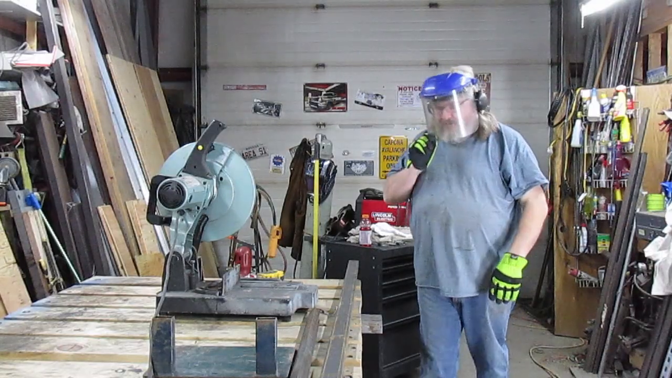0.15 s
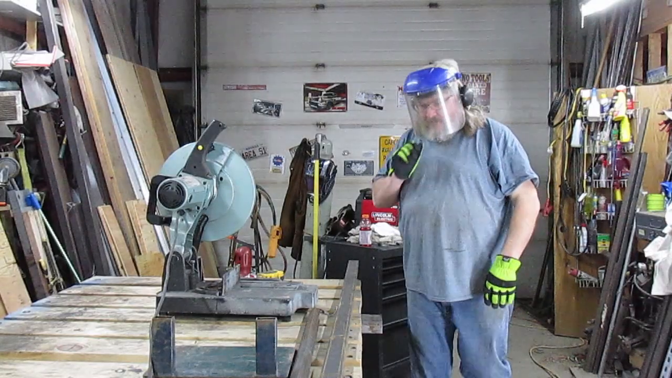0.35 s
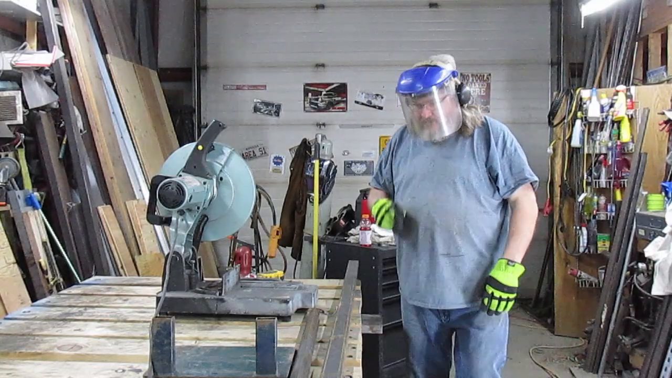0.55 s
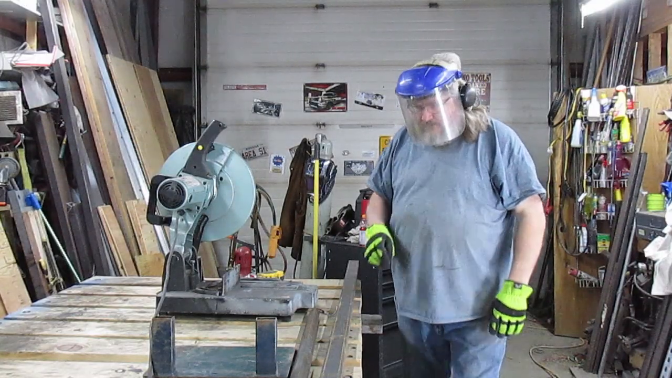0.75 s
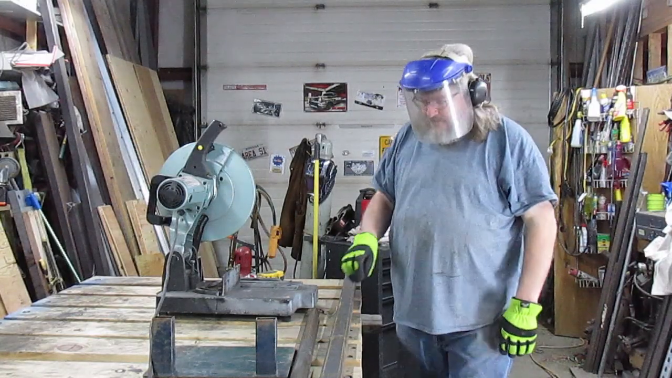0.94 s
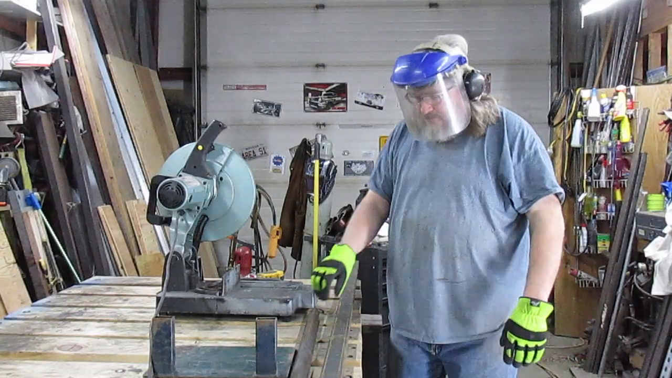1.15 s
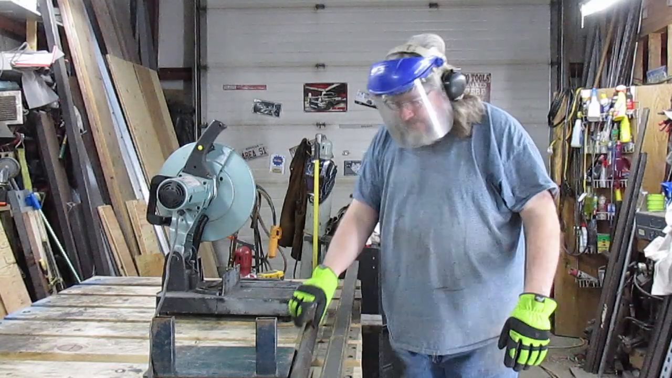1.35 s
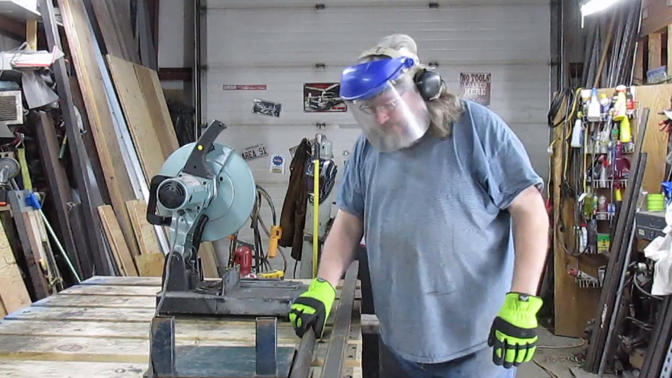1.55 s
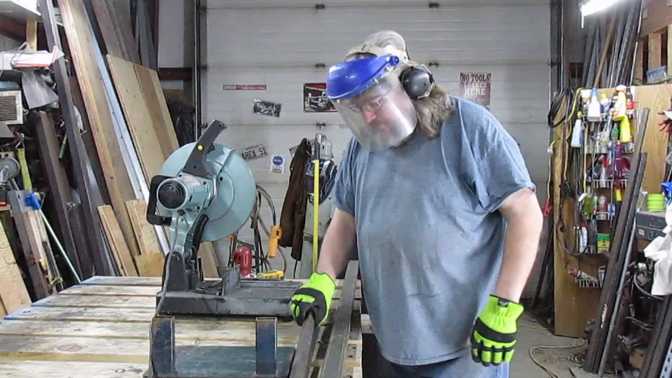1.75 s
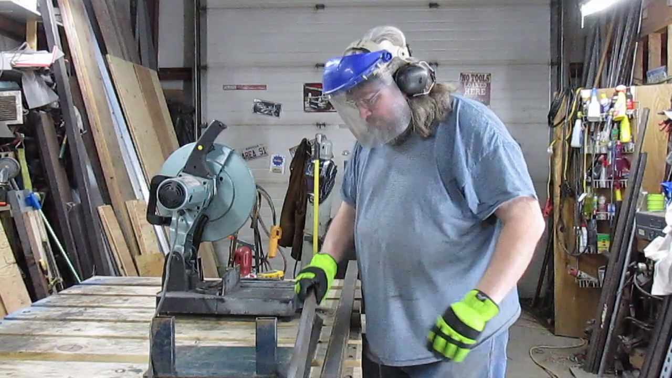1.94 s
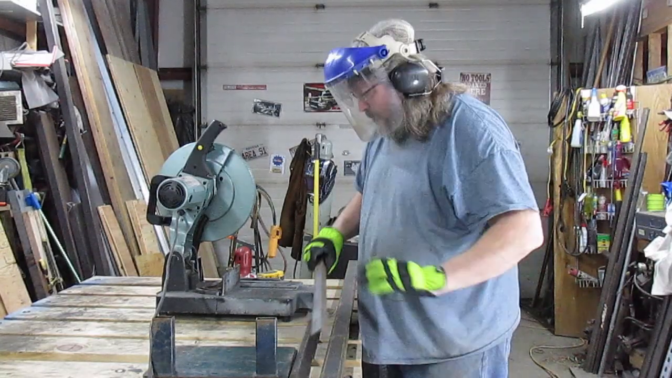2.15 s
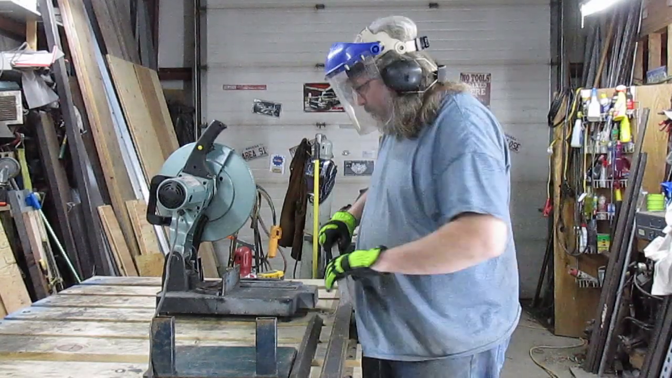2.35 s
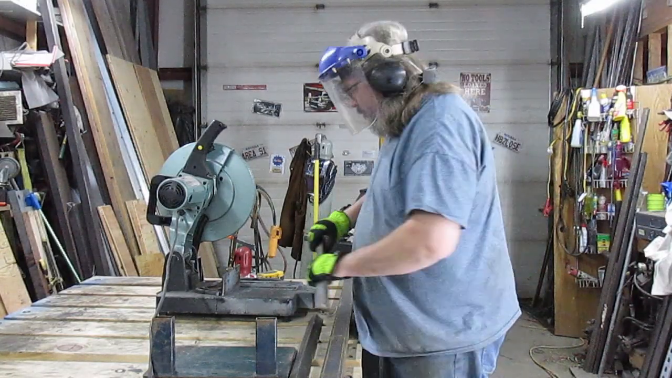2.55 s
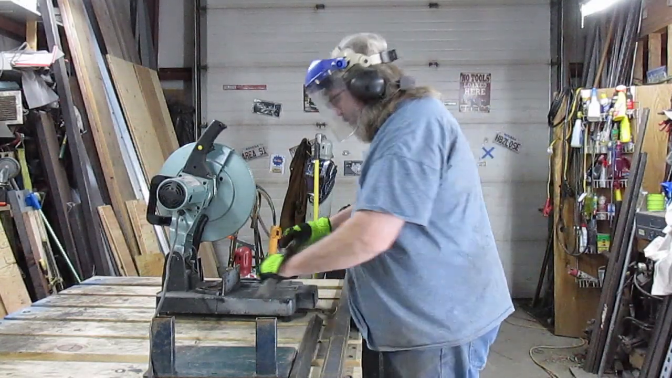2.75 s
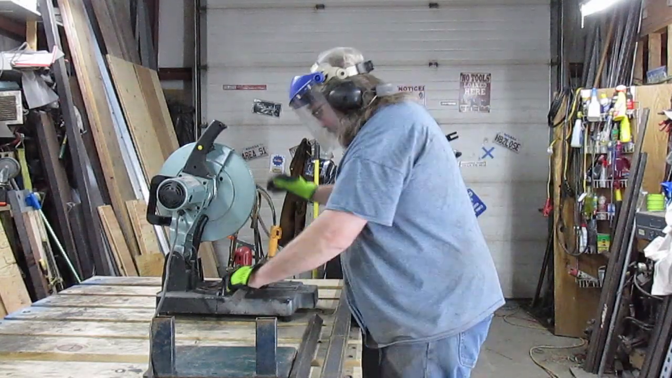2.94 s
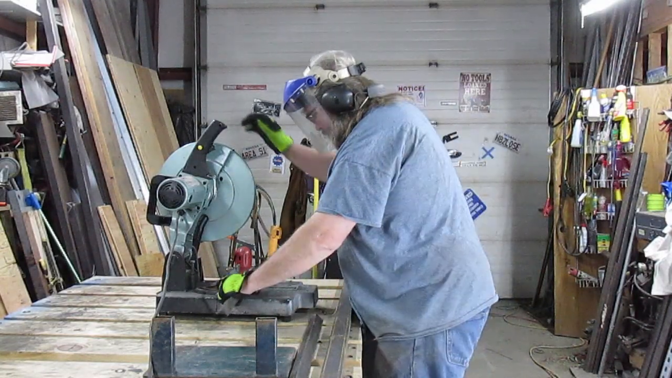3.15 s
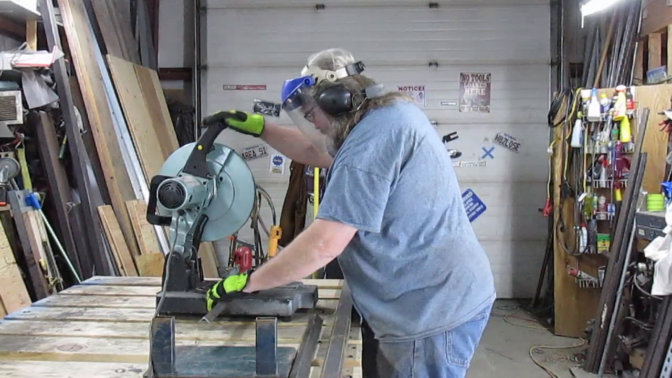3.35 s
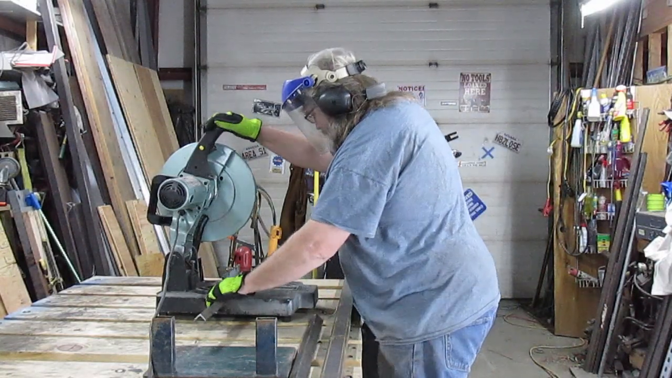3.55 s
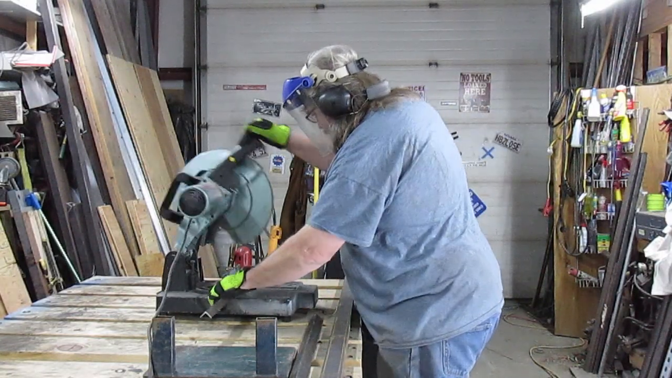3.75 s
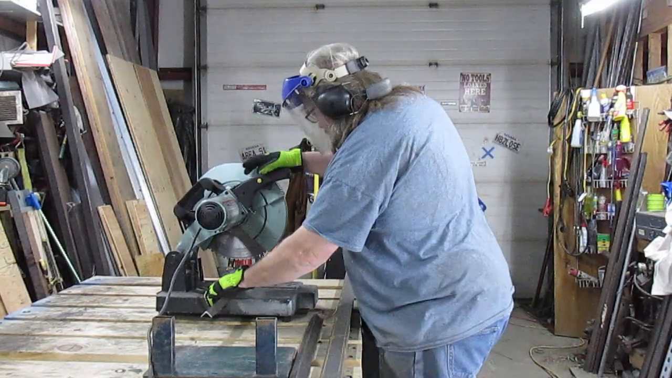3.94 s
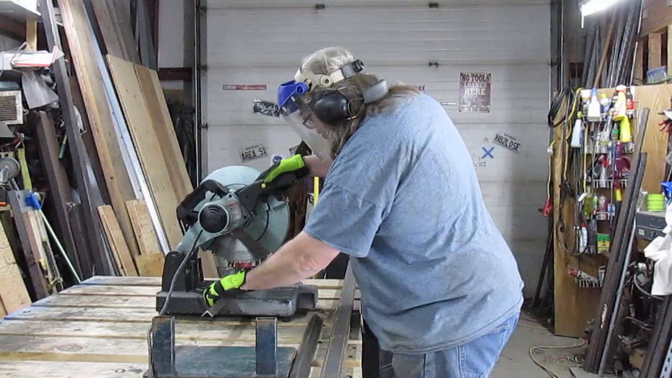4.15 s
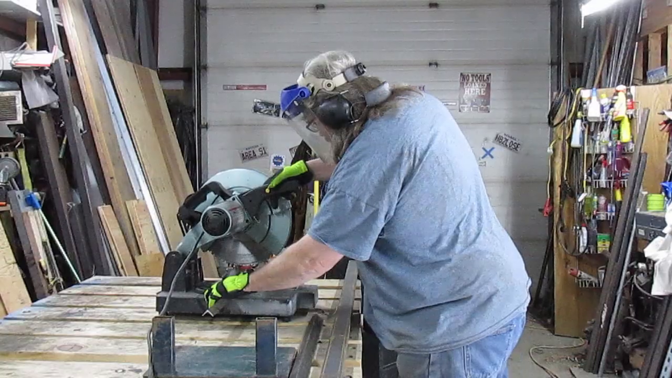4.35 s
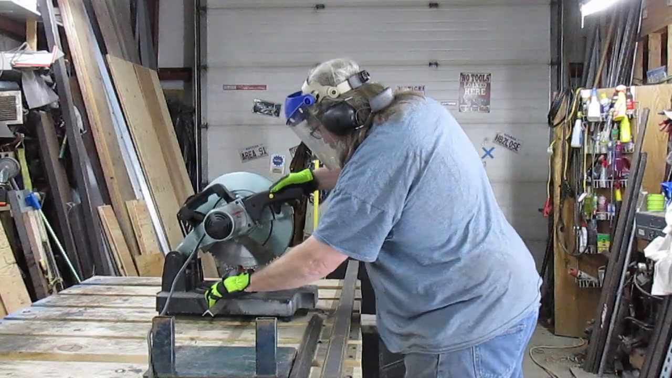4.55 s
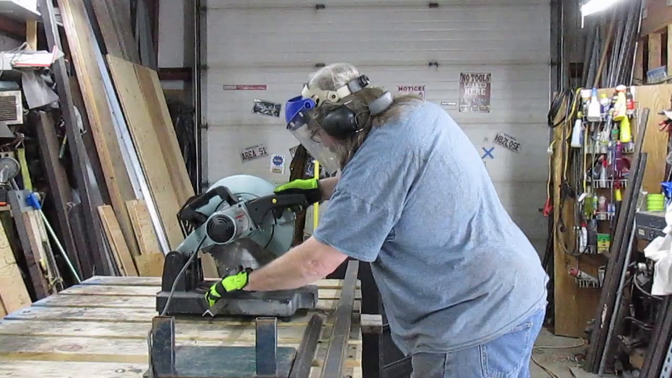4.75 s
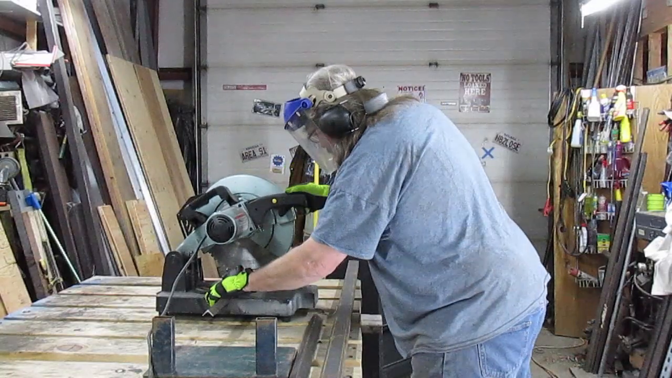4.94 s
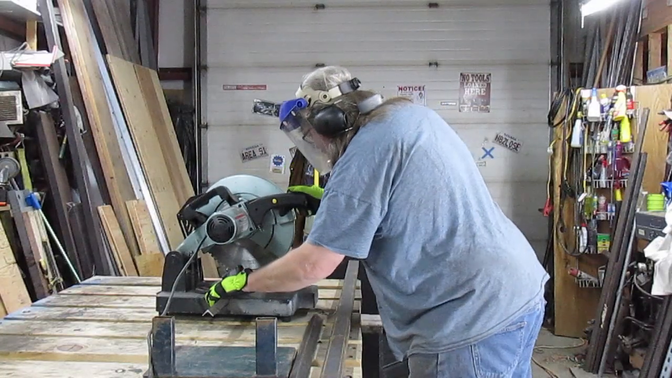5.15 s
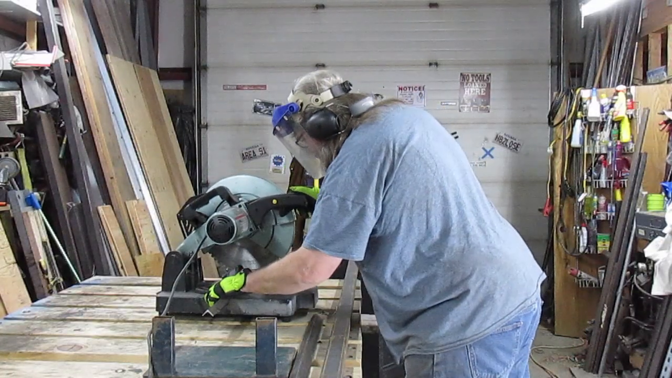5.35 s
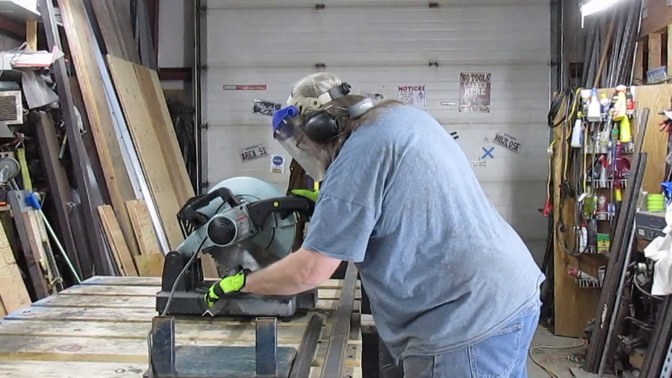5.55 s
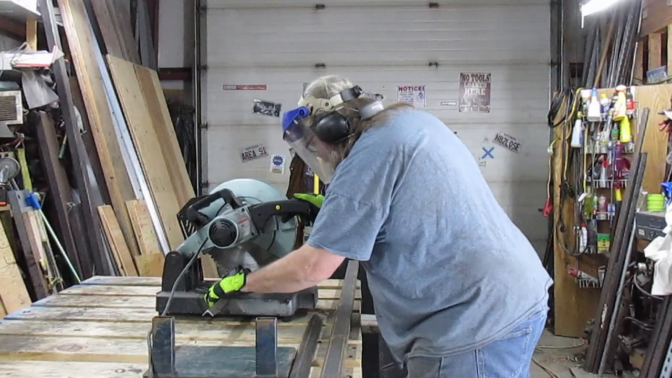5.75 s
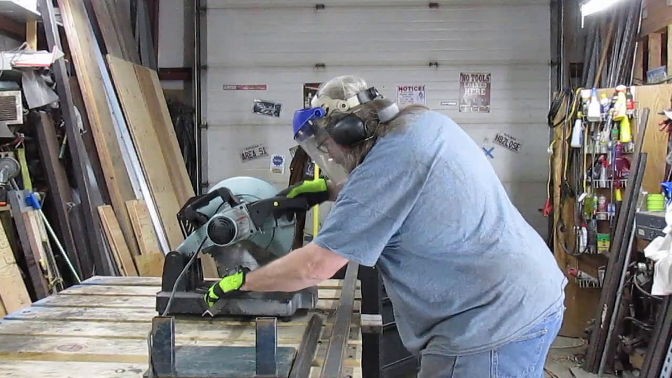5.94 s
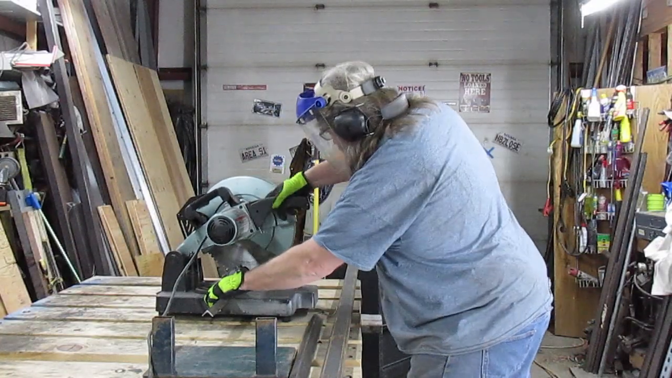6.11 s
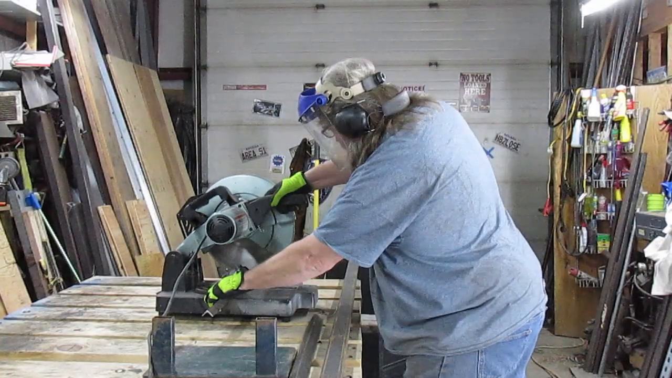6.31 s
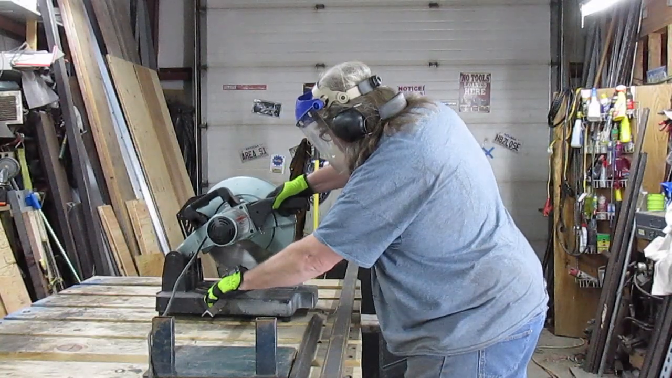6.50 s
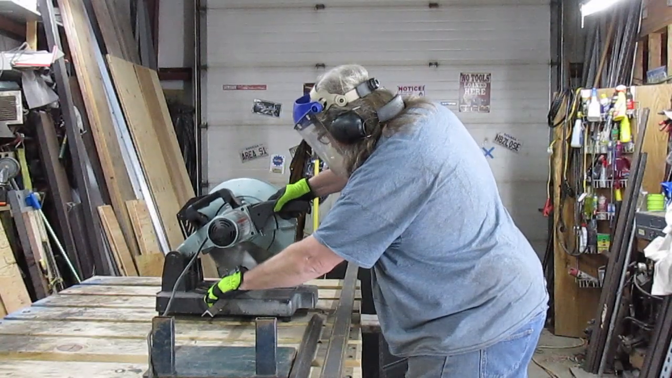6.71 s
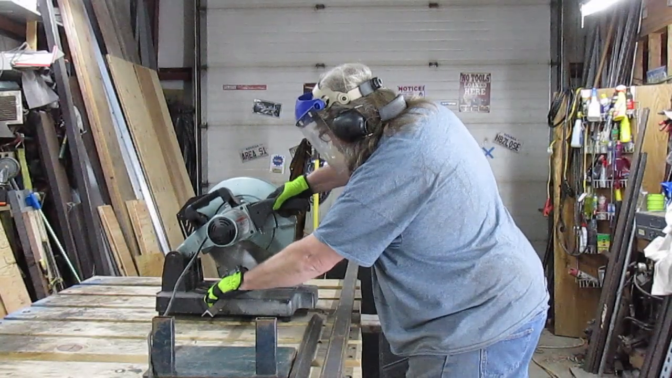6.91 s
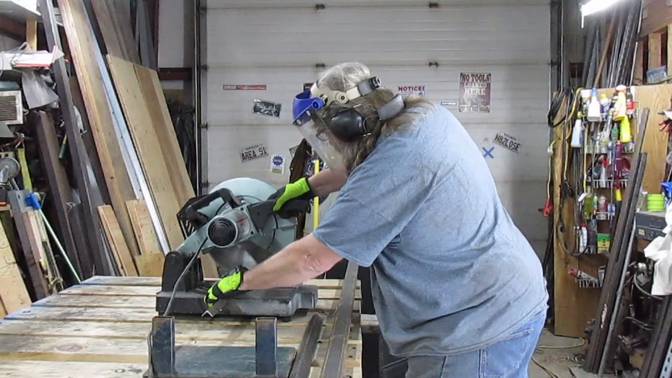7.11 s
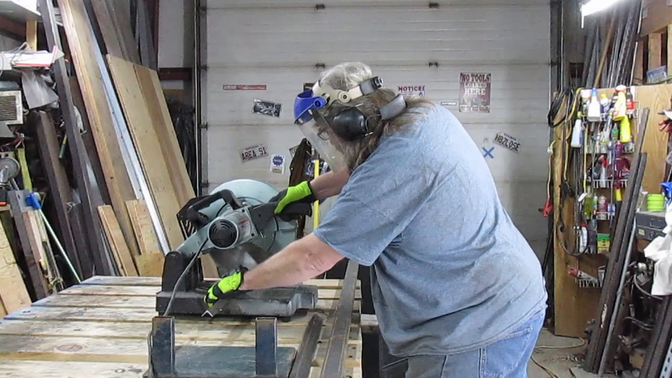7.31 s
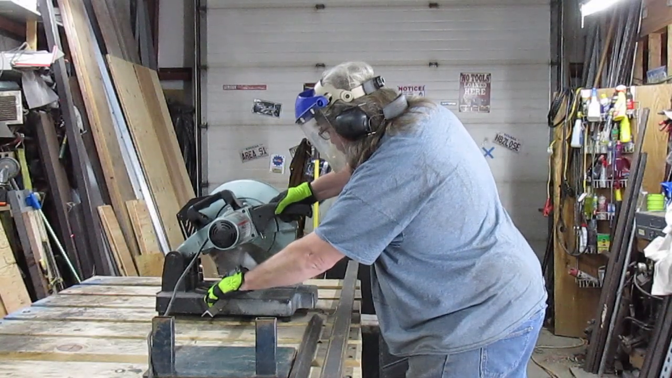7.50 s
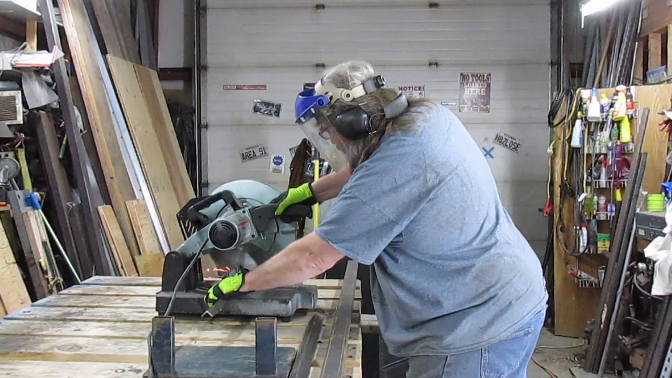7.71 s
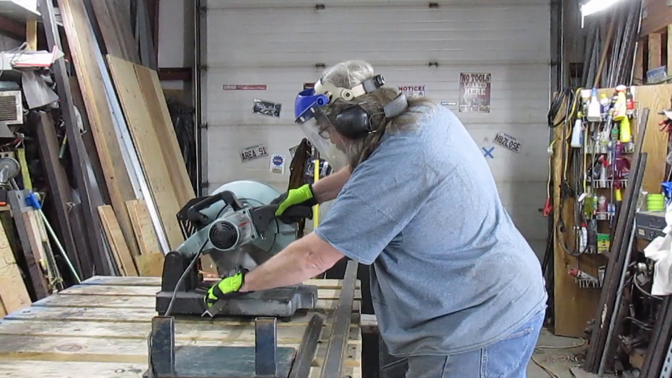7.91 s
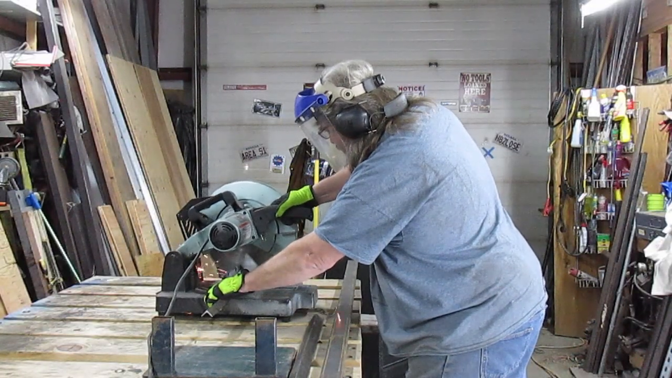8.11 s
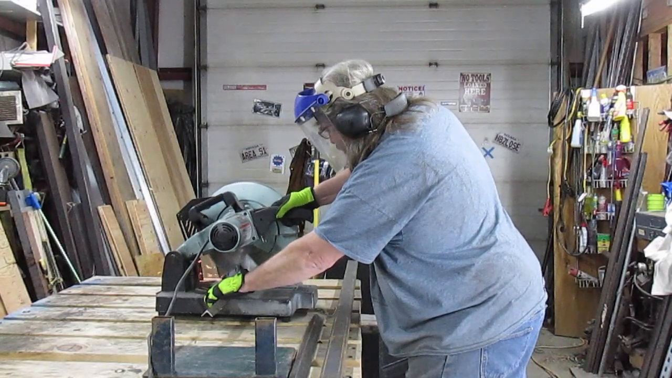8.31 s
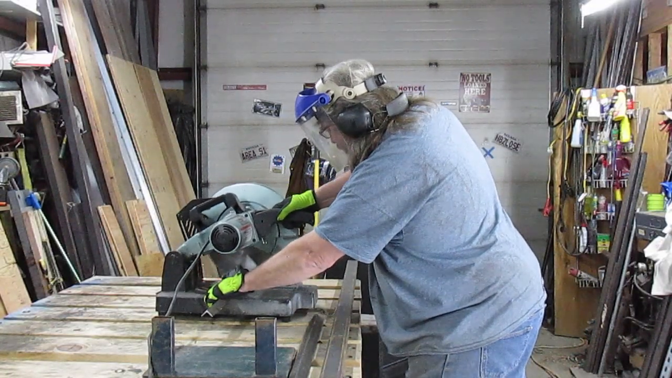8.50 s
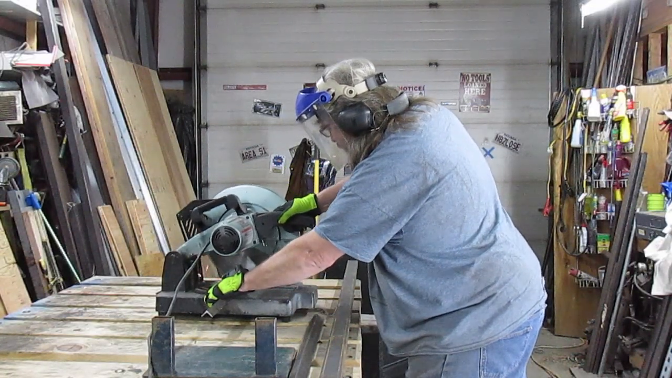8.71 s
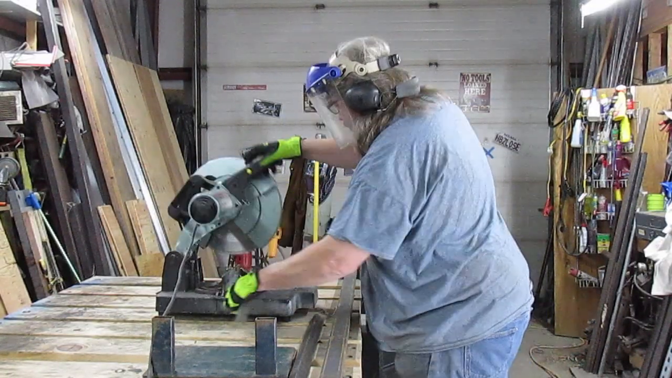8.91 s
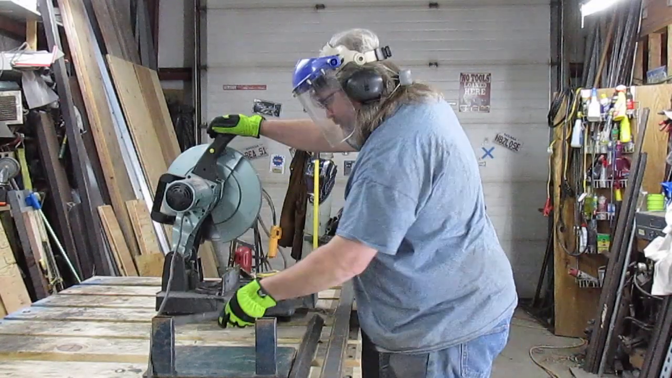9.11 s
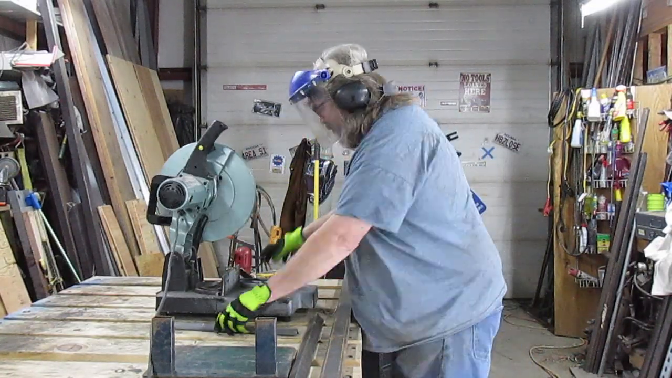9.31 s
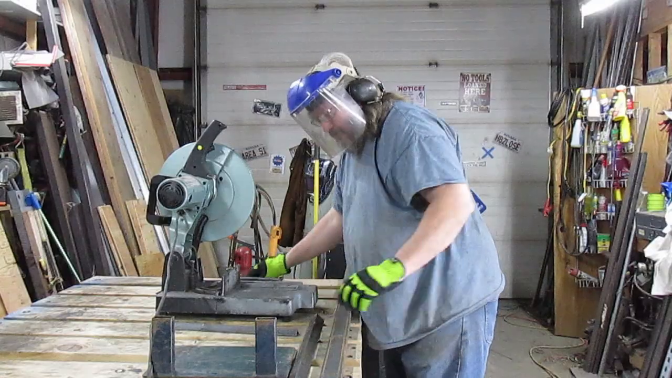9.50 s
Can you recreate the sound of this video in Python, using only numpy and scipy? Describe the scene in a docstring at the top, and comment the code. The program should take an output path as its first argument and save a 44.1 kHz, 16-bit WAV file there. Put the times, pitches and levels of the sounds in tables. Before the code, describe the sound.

In a moderately live workshop, gloves and boots scuff and small taps sound before a steel bar clanks hard onto a chop saw. Lower knocks and scrapes follow, then a run of soft vice clicks. The motor kicks on with a thump, whining up into a loud bright roar. The disc bites, grinding and ringing with a brief squeal, then power cuts and the whine slides down amid late knocks. Stereo microphones a few metres away.

```python
"""Scuffs and knocks of handling come first, over quiet hiss and rumble: a steel bar goes into a chop saw.
The vice clicks shut, the motor whine runs up, the disc grinds through the bar and coasts down.
Scrapes, roar and hiss are shaped noise, the whine is three sine lines that follow the shaft speed,
and the bar, base and vice are resonances shaken by noise, grit or single kicks.
A pair of microphones a few metres off hears it all, with some echo from the shop."""
import sys
import numpy as np
from scipy import signal
from scipy.fft import rfft, irfft
from scipy.io import wavfile
from scipy.ndimage import uniform_filter1d

SR = 44100
rng = np.random.default_rng(int(sys.argv[2]) if len(sys.argv) > 2 else 0)


def boost(x):
    """Linear amplitude factor 10**(x/20) for a level x in decibels (scalar or array-like)."""
    u = np.asarray(x, float) / 20
    return 10 ** u


def transcribe(u):
    """Save the signal u as a 16-bit wav file named by the first command-line argument.

    u: samples, shape (n,) or (channels, n), limited to [-1, 1]; the rate is SR.
    q: integer samples, one column per channel.
    """
    v = np.clip(np.atleast_2d(u).T, -1, 1)
    q = np.round(v * 32767).astype(np.int16)
    wavfile.write(sys.argv[1], SR, q)


N = 426006
TIME = np.arange(N) / SR

# Roar of the saw: (time [s], level [dB])
ROAR = [(6.185, -23.5), (6.225, -28), (6.26, -21.5), (6.84, -21.5), (6.9, -25), (7.1, -20.5), (7.3, -23),
        (8.0, -23), (8.5, -21.5), (8.72, -23), (8.78, -33.5), (9.66, -33)]
SAW_START_S, OFF_S = ROAR[0][0], 8.75  # the roar begins; power off
# Pressure of the disc on the bar: (time [s], load [0-1])
LOAD = [(7.3, 0), (7.4, .16), (7.5, .28), (7.6, .34), (7.74, .42), (7.85, .68), (7.95, .84), (8.2, .93),
        (8.32, .79), (8.5, .85), (8.7, .9), (8.78, 1), (8.85, .785)]
# Colour of disc and cooling air, running free: (frequency [Hz], relative level [dB])
RUNNING = [(35, -85), (60, -58), (467, -1), (694, -2), (1010, 3), (1190, -2.5), (2390, -1.5), (3020, 3.5),
           (7670, -9), (8820, -8), (11900, -10.5), (15800, -29.5)]
# Colour of grit on steel: (frequency [Hz], relative level [dB])
CUTTING = [(35, -65), (60, -53), (255, -19.5), (446, -7.5), (618, -22.5), (1370, -5), (1810, -6),
           (4090, -4), (7670, -2.5), (9030, 2), (12500, -5), (15800, -20.5)]
# Colour with the power off: (frequency [Hz], relative level [dB])
COASTING = [(35, -78), (60, -48), (152, -57), (221, -23.5), (370, -11), (478, -6.5), (817, -7), (2280, -5),
            (3720, -3), (4280, -8.5), (10400, -9.5), (15800, -26)]
# Modes of the bar held in the vice: (frequency [Hz], width [Hz], relative level [dB])
CLAMPED_BAR = [(1412, 25, -5), (1700, 25, 0), (2610, 40, -5), (3190, 60, 0)]
# High modes of the disc: (frequency [Hz], width [Hz], relative level [dB])
HIGH_DISC = [(8210, 30, -2), (8808, 25, 0), (9372, 28, -1), (9760, 30, -6)]
# Low mode of the disc: (frequency [Hz], width [Hz], relative level [dB])
LOW_DISC = [(1241, 7, 0)]
# The disc sings: (peak time [s], rise [s], fade to -60 dB [s], level [dB])
SQUEAL = [(8.22, .07, 0.67, -23)]
GRIND_FREE, GRIND_LOADED = 0.34, 0.39  # share of grit in the roar: running free, and added at full load
BAR_DB, HIGH_DISC_DB, HIGH_DISC_LOADED_DB = -34.5, -33, 5.0  # rings of the cut; rise of the disc at full load
BITE = 0.071  # load from which the rings are fully excited
SHAKE_DB = -26  # force on the base, relative to the roar


def saw():
    """Air roar turns to grinding under load while bar and disc ring; also returns the force on the base."""
    level_db, load = curves(ROAR, TIME)[0], curves(LOAD, TIME)[0]
    on = np.clip((TIME - SAW_START_S) / 0.0045, 0, 1)

    def colour(t, hz):
        share = np.clip(GRIND_FREE + GRIND_LOADED * curves(LOAD, t)[0] ** 0.21, 0, 1)
        off = np.clip((t - OFF_S) / 0.079, 0, 1)
        powered = (1 - share) * read(RUNNING, hz) + share * read(CUTTING, hz)
        return (1 - off) * powered + off * read(COASTING, hz)

    sparks = 1 + .12 * uniform_filter1d(abs(grit(1.8, 680)), size=40)
    roar = noise(colour, size=1024, lo_hz=700, hi_hz=14300, patchy_db=2.07)
    roar = roar * boost(level_db) * sparks / sparks.mean()

    touch = np.clip(load / BITE, 0, 1) * np.clip((OFF_S - TIME) / 0.037, 0, 1)
    bar_level = touch * boost(BAR_DB - 5.8 * (load > .88))  # weaker when the disc presses hardest
    rings = ringing(CLAMPED_BAR, bar_level, alike=0.32)
    rings += ringing(HIGH_DISC, touch * boost(HIGH_DISC_DB + HIGH_DISC_LOADED_DB * load), alike=.1)
    rings += ringing(LOW_DISC, summed(SQUEAL, column=3), alike=0.41)
    return (roar + rings) * on, boost(level_db + SHAKE_DB) * on


# Resonances of the guard that the motor lines sweep through: (frequency [Hz], width [Hz], level [dB])
GUARD = [(2800, 450, -37), (3150, 260, -31), (3450, 200, -36), (3740, 200, -26.5), (4040, 180, -31),
         (4400, 130, -28), (4600, 110, -30.5), (7000, 1500, -48), (8440, 200, -35), (9000, 250, -33),
         (9260, 150, -35), (10800, 300, -34), (11300, 400, -32), (12000, 150, -34)]
# Level change at full load, one entry per line: whine, octave, fan line [dB]
LOADED_DB = [-8, -40, -40]
# Level change with the power off, one entry per line: whine, octave, fan line [dB]
COASTING_DB = [-7, -14, -30]
START_S, RUN_UP_S, RUN_UP_POWER, FREE_HZ = 6.1524, .1525, .812, 4656  # run-up to free speed
FULL_SAG_HZ = 675  # drop of the whine at full load
COAST_S, COAST_TAU_S, COAST_TO_HZ = 8.85, 1.063, 1135  # coasting towards a final pitch
FAN_PER_WHINE = 2.67  # pitch of the fan-blade line over the whine
FLICKER_DB = 3.0
LINES_IN_S, LINES_RISE_S = 6.245, .05  # the lines emerge from the start-up kick
BITE_S, BITE_HALF_S, BITE_DIP_DB = 7.36, .09, -9  # the lines dip as the disc first bites


def motor():
    """Commutator whine, its octave and a fan-blade line follow the shaft speed; load makes them shiver."""
    load, off = curves(LOAD, TIME)[0], np.clip((TIME - OFF_S) / .08, 0, 1)
    run_up = 1 - np.exp(-(np.maximum(TIME - START_S, 0) / RUN_UP_S) ** RUN_UP_POWER)
    hz = FREE_HZ * run_up - FULL_SAG_HZ * load
    hz = COAST_TO_HZ + (hz - COAST_TO_HZ) * np.exp(-np.maximum(TIME - COAST_S, 0) / COAST_TAU_S)
    shiver_depth = .0003 + .02 * np.clip(load - .5, 0, 1) * (1 - off)
    shiver = shiver_depth * evened(uniform_filter1d(rng.standard_normal(N), size=900))
    turns = np.cumsum(hz * (1 + shiver)) / SR

    pressed = load * np.clip(1 - (TIME - COAST_S) / 0.069, 0, 1)
    lines = 0
    for k, loaded_db, off_db in zip([1, 2, FAN_PER_WHINE], LOADED_DB, COASTING_DB):
        line_hz = k * hz[::64]  # the guard's gain is worked out at every 64th sample
        guard_power = sum(boost(db) ** 2 / (1 + (2 * (line_hz - f) / width) ** 2) ** 2
                          for f, width, db in GUARD)
        guard = np.interp(TIME, TIME[::64], np.sqrt(guard_power))
        level = guard * boost(loaded_db * pressed + off_db * off + FLICKER_DB * wander(25))
        side_phase = 0.16 * rng.random((2, 1))
        lines = lines + level * np.sin(2 * np.pi * (k * turns + side_phase))
    fade_in = np.clip((TIME - LINES_IN_S) / LINES_RISE_S, 0, 1)
    dip = boost(BITE_DIP_DB * np.exp(-((TIME - BITE_S) / BITE_HALF_S) ** 2))
    return np.sqrt(2) * lines * fade_in * dip


# Modes of the cast saw base: (frequency [Hz], width [Hz], relative level [dB])
BASE = [(199, 77, -13), (447.3, 13.6, 2), (481.8, 42, 3.5), (529, 18, -2)]


def base(shake):
    """The heavy base booms in a few low modes, nearly alike on both sides."""
    return ringing(BASE, shake * boost(-5.5), alike=0.87)


# Light taps at the bench, to the right:
# (time [s], relative peak [dB], brightness [dB], body pitch [Hz])
TAPS = [(0.2435, -33.5, -4, 3870), (0.5496, -41.5, -5, 2630), (0.612, -36, 0, 2820), (0.6295, -44, 3, 2800),
        (0.6397, -14.5, -9, 3500), (0.779, -29.5, -9, 2320), (0.9547, -30.5, 1, 4890),
        (1.019, -35, 15, 3300), (1.026, -24.5, 27, 3270), (1.279, -27, -1, 3520), (2.025, -31, 26, 3610),
        (2.175, -35.5, 9, 2280), (2.3226, -30.5, 16, 3320), (2.609, -28.5, -2, 1430),
        (2.9313, -30.5, 14, 3680)]
TAP_RING_DB, TAP_PAN_DB, TAP_LOW_HZ = -22, -8, 1900  # kick to the steel; left over right; weak under this
# Clanks and knocks: the bar, the motor's start-up kick, late knocks during the coast-down:
# (time [s], relative peak [dB], brightness [dB], body pitch [Hz], kick to the steel, over the peak [dB])
CLANKS = [(1.8372, -18.5, -2, 4570, -28), (1.8571, -13.5, -27, 2050, -19), (3.0899, 0, 7, 4600, -35),
          (3.2557, 0.5, -3, 2590, -8.5), (3.872, -15.5, -8, 3570, -36), (4.0825, -16.5, -7, 1670, -12),
          (4.523, -20.5, -8, 890, -28), (4.6673, -29, -33, 1310, -35), (3.599, -17, -14, 1900, -29),
          (4.748, -39, -5, 3000, -30), (6.1946, -4, 4, 940, -12.5), (9.27, -20, -22, 3340, -15),
          (9.365, -18, -22, 1800, -12), (9.5804, -16, -20, 3700, -7)]
CLANK_PAN_DB, CLANK_LOW_HZ = -2.5, 300  # left over right; blows are weak under this
# Clicks of the vice screw: (time [s], relative peak [dB])
VICE = [(5.396, -30.5), (5.4609, -29.5), (5.5381, -28), (5.5871, -27.5), (5.689, -29.5), (5.769, -29.5),
        (5.839, -32.5)]
VICE_BRIGHT_DB, VICE_BODY_HZ, VICE_RING_DB, VICE_PAN_DB = -9, 1180, -27, -3
# Colour of scrapes and blows: (frequency [Hz], relative level [dB])
RUB_COLOUR = [(150, -20), (400, -3.5), (1000, 1), (3000, 3.5), (6000, -2), (10000, -1), (13000, -10),
              (16000, -26.5)]


def blows():
    """Each blow is a sharp bright crack, a longer knock around its body pitch, and a kick to the steel."""
    size = SR // 4
    out, kicks = np.zeros((2, N + SR)), np.zeros(N)
    t, hz = np.arange(size) / SR, np.fft.rfftfreq(size, 1 / SR)
    rows = [(*r, TAP_RING_DB, TAP_PAN_DB, TAP_LOW_HZ) for r in TAPS]
    rows += [(*r, CLANK_PAN_DB, CLANK_LOW_HZ) for r in CLANKS]
    rows += [(*r, VICE_BRIGHT_DB, VICE_BODY_HZ, VICE_RING_DB, VICE_PAN_DB, CLANK_LOW_HZ) for r in VICE]
    for s, db, bright_db, body_hz, ring_db, pan_db, low_hz in rows:
        raw = rng.standard_normal((2, size))
        raw = raw + 1.6 * raw[0]  # a part shared by both sides
        spectrum = rfft(raw) * boost(read(RUB_COLOUR, hz)) / np.sqrt(1 + (low_hz / (hz + 1)) ** 4)
        crack = evened(irfft(spectrum * boost(tilt(hz, bright_db, 1.7, 3600)), size))
        crack = crack * boost(-60 * t / 0.028)
        knock = evened(irfft(spectrum * boost(tilt(hz, bright_db, 20.7, body_hz)), size))
        knock = knock * boost(-60 * t / 0.08) * (1 - np.exp(-t / 0.0026))
        at = round(s * SR)
        sides = boost(db + np.array([[.5], [-.5]]) * pan_db)
        out[:, at:at + size] += 0.28 * (crack + 0.5 * knock) * sides
        kicks[at] += boost(db + ring_db) * 8.4
    return out[:, :N], kicks


# Scuffs of gloves, boots and the bar:
# (peak time [s], rise [s], fade to -60 dB [s], level [dB], brightness [dB])
SCUFFS = [(.02, 0.035, 0.88, -50.5, 7), (.26, 0.034, 0.45, -45, 2), (.642, 0.01, 0.45, -34, 2),
          (.72, 0.12, 0.32, -42.5, 4), (.95, 0.069, 0.77, -58.5, 4), (1.04, .05, .3, -58, -4),
          (1.28, 0.01, 0.31, -36.5, -0.5), (1.345, 0.087, 0.21, -34.5, 1), (1.44, .05, .9, -55, 1.5),
          (1.61, 0.11, 0.23, -54, 3.5), (1.78, 0.18, 0.54, -43.5, -9.5), (1.875, 0.052, 0.2, -35.5, -1.5),
          (1.92, .04, 0.29, -42, -9.5), (2.19, .04, 0.36, -55, 2), (2.42, 0.14, .5, -62.5, 9),
          (2.64, .08, 0.73, -58, 1), (3.0, 0.057, .5, -44, 2), (3.075, 0.056, .3, -35, 4.5),
          (3.1, 0.023, 0.37, -25, 4.5), (3.235, 0.073, 0.25, -34.5, -2), (3.262, 0.0089, 0.49, -25, 0.5),
          (3.51, 0.016, 0.37, -46, -5), (3.6, .07, 0.72, -38, -4), (3.69, 0.11, 0.4, -37, -6),
          (3.885, 0.018, 0.53, -39, -7), (4.1, 0.027, 1, -40.5, -1), (4.345, .2, 0.35, -35.5, 1),
          (4.22, 0.13, 0.8, -39.5, -1), (4.535, 0.034, 0.56, -46.5, -14), (4.62, 0.054, 0.36, -52, -13),
          (4.675, .012, .35, -55, -19), (4.75, .03, 0.35, -55, -22), (4.94, .1, 0.4, -68.5, 17),
          (5.87, 0.12, 0.22, -54, -30), (6.016, 0.031, 0.19, -48, -6)]
# Metal on metal, shaking base and bar:
# (peak time [s], rise [s], fade to -60 dB [s], relative base boom [dB], relative bar ring [dB])
JOLTS = [(.27, .05, 0.98, -57.5, -90), (3.22, .02, .3, -40, -36), (.69, .07, .9, -61, -90),
         (1.3, .04, .9, -70, -90), (1.785, .11, 0.25, -39, -38.5), (1.865, .03, 0.26, -44, -42),
         (1.915, 0.058, 0.34, -35, -54), (2.18, .04, 0.45, -54.5, -77), (3.06, 0.078, .3, -44, -55),
         (3.11, 0.024, 0.26, -24.5, -25), (3.245, 0.044, .8, -26, -31.5), (3.3, 0.048, 0.2, -32.5, -20.5),
         (3.5, .02, 0.2, -40, -60), (3.605, 0.087, 0.91, -34.5, -43), (3.7, 0.046, 0.69, -34, -62),
         (3.885, 0.024, 0.45, -30, -54), (4.095, 0.036, 0.74, -42, -58), (4.535, 0.061, 0.28, -41, -55),
         (4.62, 0.037, 0.91, -50, -65), (4.93, .08, 0.23, -58, -94), (5.52, 0.046, 0.53, -42.5, -80),
         (5.74, 0.052, 0.57, -47.5, -80), (6.02, 0.038, 0.16, -49.5, -81), (6.205, 0.024, 0.41, -18, -60),
         (6.29, .08, 0.17, -26, -80), (6.53, 0.072, 0.9, -42, -80), (7.11, 0.37, 0.8, -48, -80),
         (7.485, 0.028, 1.3, -37, -80), (7.77, 0.11, 0.84, -31, -80), (8.47, 0.23, 0.21, -42, -80),
         (8.7, .03, 0.71, -41.5, -80), (9.31, 0.085, 0.32, -40, -73), (9.54, 0.022, .7, -36, -70)]
BODY_DB, BODY_PER_DULL = 2.5, 0.62  # duller scuffs carry more weight near 1 kHz: dB, dB per dB
THIN_DB, SUDDEN_S = -15, 0.016  # scuffs with a rise this short are thin around 1 kHz, unless dull
HARD_DB = -21  # contacts this strong are sharp enough to ring the high modes too
# A scuff after each vice click
RATTLE_RISE_S, RATTLE_T60_S, RATTLE_UNDER_DB, RATTLE_BRIGHT_DB = .006, .2, -23, -12


def rubbing():
    """Gloves, boots and the bar slide as grainy noise; returns the scrape and the force on the bar."""
    rows = SCUFFS + [(s + RATTLE_RISE_S, RATTLE_RISE_S, RATTLE_T60_S, db + RATTLE_UNDER_DB, RATTLE_BRIGHT_DB)
                     for s, db in VICE]
    _, rise, _, level_db, bright_db = np.array(rows).T
    thin_db = THIN_DB * np.exp(-(rise / SUDDEN_S) ** 2) * (bright_db > -7)

    def colour(t, hz):
        # overlapping scuffs share their colour by power
        power = (strokes(rows, t) * boost(level_db[:, None])) ** 2 + 1e-12
        high_db = bright_db @ power / power.sum(0)
        body_db = BODY_DB - BODY_PER_DULL * np.clip(high_db, -18, 5) + thin_db @ power / power.sum(0)
        return read(RUB_COLOUR, hz) + tilt(hz, high_db, body_db)

    grain = 1 + .25 * uniform_filter1d(abs(grit(4.0, 300)), size=60)
    scrape = noise(colour, size=256, lo_hz=1000, hi_hz=4920, patchy_db=2.0)
    scrape = scrape * summed(rows, column=3) * boost([[-1.2], [1.2]]) * grain / grain.mean()

    # a blunt contact drives the low modes most
    blunt = 2.9 * signal.lfilter(*signal.butter(2, 2600, fs=SR), grit(3.0, 3000))
    sharp = 1.6 * grit(3.0, 3000)
    ring = summed(JOLTS, column=4)
    hardness = np.minimum(ring / boost(HARD_DB), 1)
    return scrape, (blunt + hardness * (sharp - blunt)) * ring


# Modes of the steel bar: (frequency [Hz], relative level [dB], fade to -60 dB [s])
STEEL = [(1000, -10, .08), (1360, -9, .1), (1560, -6, .1), (1700, 0, .18), (1910, -5, .15), (2000, -6, .12),
         (2615, -1, .2), (3375, -1, .18), (3600, -14, .35), (4156, -10, .2), (4380, -10, .2),
         (4905, -7, .25), (5233, -11, .2), (5615, -12, .25), (6245, -5, .22), (6826, -14, .2),
         (7273, -14, .2), (8210, -14, .2), (8810, -12, .2), (9372, -13, .2), (9965, -13, .2),
         (10590, -16, .2)]


def steel(force, wander_db):
    """A force rings the bar's modes; as contact shifts, each swells and fades alike on both sides,
    with slightly different phase."""
    out, t = np.zeros((2, N)), np.arange(SR // 2) / SR
    energy = sum(boost(db) ** 2 * t60 for hz, db, t60 in STEEL) * SR / (4 * np.log(1000))
    for hz, db, t60 in STEEL:
        drift = np.interp(TIME, np.arange(101) / 10, rng.standard_normal(101))
        side_phase = (rng.random((2, 1)) - .5) * min(hz / 9000, .5)
        mode = boost(db - 60 * t / t60) * np.sin(2 * np.pi * (hz * t + side_phase))
        push = force * boost(wander_db * drift)
        out += signal.oaconvolve(push[None], mode, axes=1)[:, :N]
    return out / np.sqrt(energy)


# Modes of the vice's loose jaw: (frequency [Hz], width [Hz], relative level [dB])
VICE_BODY = [(926, 17, -1.5), (1050, 88, 0), (1264, 34, -3), (1396, 16, -1), (2330, 68, -5)]
VICE_BODY_DB = -20  # force on the jaw, relative to the click's table level


def vice():
    """The loose jaw rattles in its body modes after each click."""
    rows = [(s + .005, .005, .22, db + VICE_BODY_DB) for s, db in VICE]
    return ringing(VICE_BODY, summed(rows, column=3), alike=.5)


# Modes of a loose part on the saw: (frequency [Hz], level [dB], fade to -60 dB [s])
CLINK = [(1800, -26, .09), (3370, -29, .14)]
CLINK_S = 9.267


def clink():
    """A loose part is struck once and rings in a few short decaying sine modes."""
    t = np.maximum(TIME - CLINK_S, 0)
    modes = sum(boost(db - 60 * t / t60) * np.sin(2 * np.pi * hz * t) for hz, db, t60 in CLINK)
    return modes * np.minimum(t / 0.0025, 1)


# Reverberation of the shop: (frequency [Hz], fade to -60 dB [s])
SHOP = [(250, 0.35), (1000, 0.25), (4000, 0.15), (12000, 0.25)]


def shop(x):
    """Sparse reflections of random sign, each band dying at its own speed."""
    taps = np.zeros((2, SR))
    at = np.arange(300, SR - 20, 20) + rng.integers(0, 20, (2, (SR - 301) // 20))
    np.put_along_axis(taps, at, rng.choice([-1., 1.], at.shape), 1)
    hz, t, z = signal.stft(taps, SR, nperseg=256)
    fade = boost(-60 * t / read(SHOP, hz)[:, None])
    tail = signal.istft(z * fade, SR, nperseg=256)[1]
    return signal.fftconvolve(x, tail / np.linalg.norm(tail[0]), axes=1)[:, :N]


# Colour of the room hiss: (frequency [Hz], relative level [dB])
HISS = [(12, -37), (20, -13), (70, -10), (133, -6.5), (570, -13.5), (916, -16), (1650, -17.5),
        (1790, -19.5), (2000, -20.5), (2500, -20.5), (5620, -23.5), (7860, -24), (8550, -11.5), (9560, -23),
        (15800, -29)]
# Faint fuzzy hums of the building: (frequency [Hz], width [Hz], level [dB])
HUM = [(238, 11.3, -65.5), (134, 15, -67.5)]
# Lumpiness of the rumble: before the saw starts, after it starts [dB]
RUMBLE_LUMPS_DB = [5, 2]
HISS_DB = -59
FUZZ_HZ, FUZZ_WIDTH_HZ, FUZZ_DB = 8570, 260, -67  # a fuzzy high band in the hiss
RUMBLE_DB, RUMBLE_DIM_DB = -63, -17  # middle level before the saw; change from the saw's start on
RUMBLE_LOADED_DB = 14.5  # the bench shakes under the cut: rise at full load


def background():
    """Room hiss with a high fuzzy band, hums until the saw starts, and a low rumble, all filtered noise."""
    hiss = noise(lambda t, hz: read(HISS, hz) + 0 * t, size=2048, lo_hz=282, hi_hz=16000, patchy_db=3.5)
    raw = rng.standard_normal((2, N))
    fuzz = resonate(resonate(raw, FUZZ_HZ, FUZZ_WIDTH_HZ), FUZZ_HZ, FUZZ_WIDTH_HZ)
    hum = ringing(HUM, TIME < SAW_START_S, alike=.8)

    running = np.clip((TIME - SAW_START_S) / 0.18, 0, 1)
    rumble_db = RUMBLE_DB + RUMBLE_DIM_DB * running
    rumble_db = rumble_db + RUMBLE_LOADED_DB * curves(LOAD, TIME)[0] * (TIME < OFF_S)
    rumble_db = rumble_db + np.interp(running, [0, 1], RUMBLE_LUMPS_DB) * wander(4)
    low_band = signal.butter(2, [40, 160], "band", fs=SR, output="sos")
    rumble = evened(signal.sosfilt(low_band, raw + raw[0])) * boost(rumble_db)
    return above(hiss, 153) * boost(HISS_DB) + evened(fuzz) * boost(FUZZ_DB) + hum + rumble


# Likeness of the two sides: (frequency [Hz], left-right correlation [-1 to 1])
SAME = [(60, 0.04), (180, -0.0385), (550, -0.00073), (1650, 0.019), (4970, -0.015), (15000, -0.026)]
# Balance of the two sides: (frequency [Hz], left over right [dB])
LEAN = [(60, -8.5), (180, 0), (550, 2), (1650, -1), (4970, -2), (15000, 2.5)]


def noise(colour, size, lo_hz, hi_hz, patchy_db):
    """Stereo noise from short-time spectra colour(t, hz) in dB, each frame evened between lo and hi."""
    t, hz = np.arange(N * 4 // size + 5) * size / 4 / SR, np.fft.rfftfreq(size, 1 / SR)[:, None]
    a, b, c, d, patches = rng.standard_normal((len(t), len(hz), 5)).T
    patches = uniform_filter1d(uniform_filter1d(patches, size=8, axis=0), size=8, axis=1)
    gain = boost(colour(t, hz) + patchy_db * evened(patches))
    in_band = (hz > lo_hz) & (hz < hi_hz)
    gain /= np.sqrt((gain ** 2 * in_band).sum(0) / len(hz))
    same = np.clip(read(SAME, hz), -1, 1)
    left, other = a + 1j * b, c + 1j * d
    z = np.array([left, same * left + np.sqrt(1 - same ** 2) * other])
    z *= gain * boost(np.multiply.outer([.5, -.5], read(LEAN, hz)))
    return signal.istft(z, nperseg=size, noverlap=size * 3 // 4)[1][:, :N] * np.sqrt(16 / 3 / size)


def ringing(modes, level, alike=.5):
    """Noise of the given level through steep-sided modes; alike = share common to both sides."""
    force = rng.standard_normal((2, N))
    force[1] = alike * force[0] + np.sqrt(1 - min(alike, 1) ** 2) * force[1]
    out = 0
    for hz, width, db in modes:
        mode = resonate(resonate(force * level, hz, width), hz, 4 * width)
        out = out + boost(db) * mode / np.sqrt(2 * np.pi * width / SR)
    return out


def resonate(x, hz, width):
    """Shifts hz down to zero, smooths, shifts back: a resonance of gain 1."""
    turn = np.exp(2j * np.pi * np.cumsum(hz * np.ones(x.shape[-1])) / SR)
    r = np.exp(-np.pi * width / SR)
    return 2 * (turn * signal.lfilter([1 - r], [1, -r], x / turn)).real


def grit(spread_db, per_s):
    """Sparse clicks of uneven size and random sign, rms 1."""
    sizes = boost(spread_db * np.minimum(rng.exponential(1, N), 4))
    return evened(sizes * (rng.random(N) < per_s / SR) * rng.choice([-1, 1], N))


RISE_POWER = 1.11  # shape of every rise


def strokes(rows, t):
    """Gain of each row (peak s, rise s, t60 s): a swell to the peak, then an even fade in dB."""
    peak, rise, t60 = np.abs(np.array(rows)[:, :3].T[..., None])
    swell = np.clip(1 + (t - peak) / rise, 0, 1) ** RISE_POWER
    return swell * boost(-60 * np.maximum(t - peak, 0) / t60)


def summed(rows, column):
    """Level in time of overlapping strokes, added as powers."""
    t = np.arange(0, N / SR + .01, .002)
    power = ((strokes(rows, t) * boost(np.array(rows)[:, column, None])) ** 2).sum(0)
    return np.interp(TIME, t, np.sqrt(power))


def wander(per_s):
    """Slow chance: random values, per_s of them a second, joined by straight lines."""
    count = int(N / SR * per_s) + 2
    return np.interp(TIME, np.arange(count) / per_s, rng.standard_normal(count))


def tilt(hz, high_db, mid_db=0, mid_hz=1050):
    """Lifts the band over about 5 kHz and a broad hump around mid_hz, in dB."""
    hump = np.exp(-np.log((hz + 1) / mid_hz) ** 2 / 0.29)
    return high_db / (1 + (5200 / (hz + 1)) ** 4) + mid_db * hump


def read(points, hz):
    """Reads a spectrum table on a log-frequency axis."""
    f, value = np.transpose(points)
    return np.interp(np.log(hz + 1), np.log(f + 1), value)


def curves(rows, t):
    """Every column of a curve table at times t."""
    s, *columns = np.transpose(rows)
    return [np.interp(t, s, c) for c in columns]


def evened(x):
    """Scales to rms 1."""
    return x / np.sqrt(np.mean(x ** 2) + 1e-20)


def above(x, hz):
    """Steep high-pass."""
    return signal.sosfilt(signal.butter(4, hz, "high", fs=SR, output="sos"), x)


def scene():
    """Handling and whine excite the room; steel and base ring from the forces on them."""
    roar, shake = saw()
    whine = motor()
    cracks, kicks = blows()
    scrape, slide = rubbing()
    bar = steel(slide + kicks, wander_db=1.5)
    boom = base(summed(JOLTS, column=3) + shake)
    loose_part = clink()
    near = roar + whine + boom + cracks + scrape + bar + vice() + loose_part
    echo = shop(boost(-12) * scrape + boost(-3) * (cracks + loose_part) + boost(-4) * bar + boost(-9) * whine)
    return above(near + echo, 181) + background()


def top_cut(x):
    """Nothing passes above the cut-off."""
    return signal.sosfilt(signal.butter(12, 16310, fs=SR, output="sos"), x)


def record(dry):
    """The sound has a narrow dip near 7.9 kHz, then the input saturates softly."""
    notch_hz, width_hz = 7870, 150
    dipped = signal.lfilter(*signal.iirnotch(notch_hz, notch_hz / width_hz, SR), dry)
    mix = np.tanh(dipped)
    return top_cut(mix)


dry = scene()
out = record(dry)
transcribe(out)
```